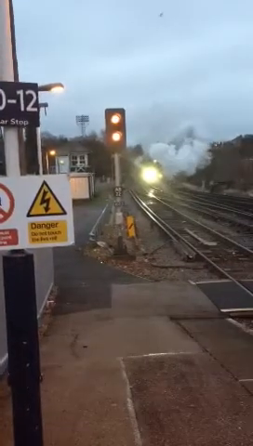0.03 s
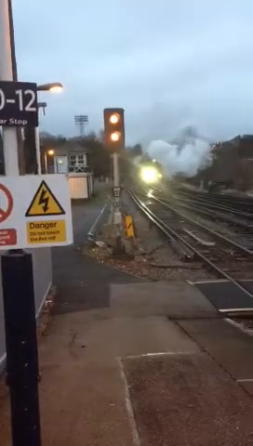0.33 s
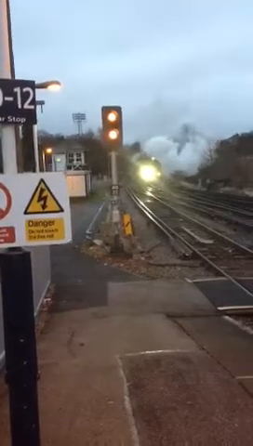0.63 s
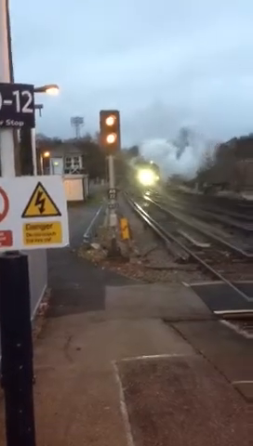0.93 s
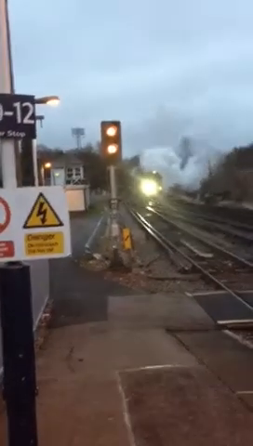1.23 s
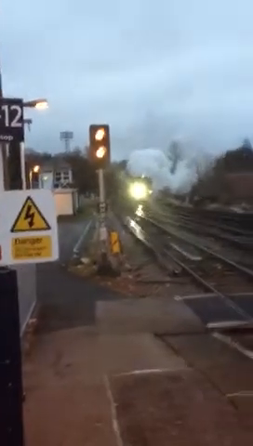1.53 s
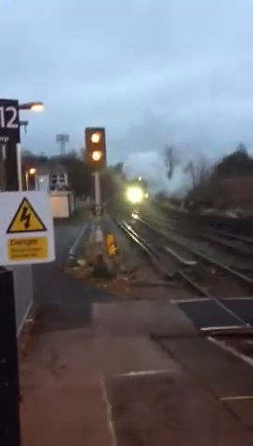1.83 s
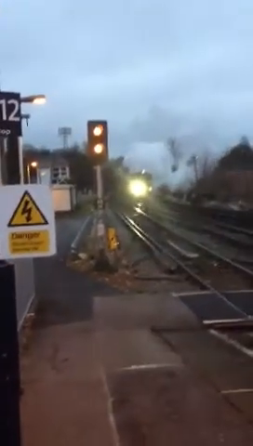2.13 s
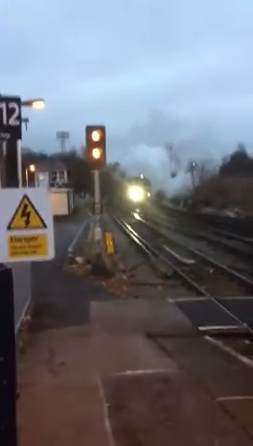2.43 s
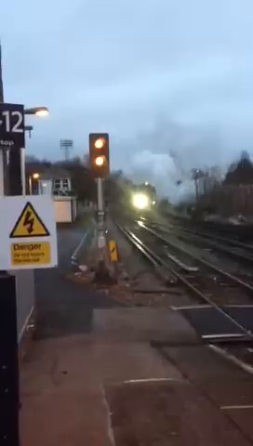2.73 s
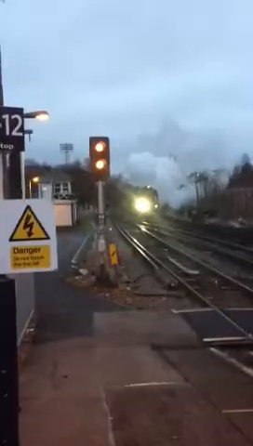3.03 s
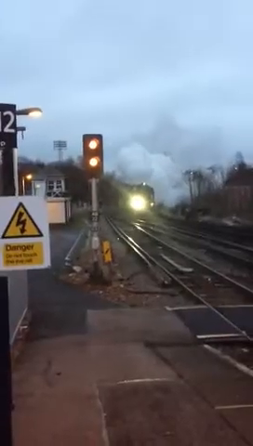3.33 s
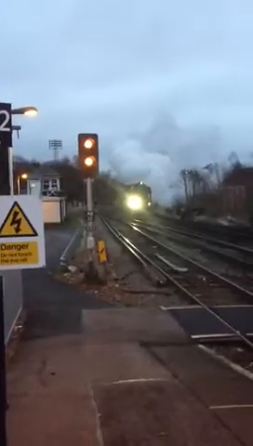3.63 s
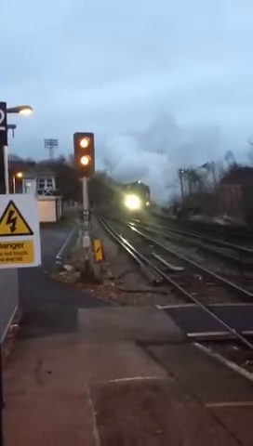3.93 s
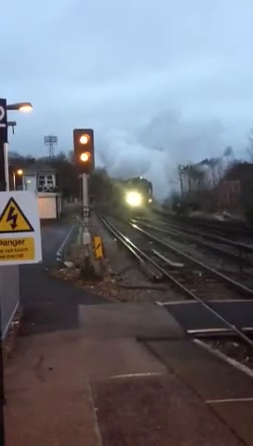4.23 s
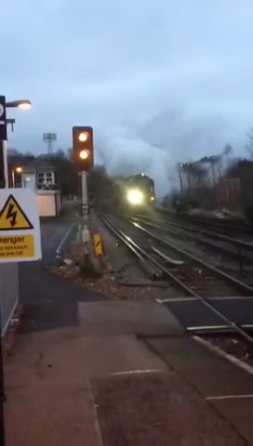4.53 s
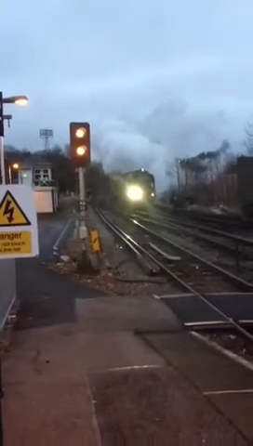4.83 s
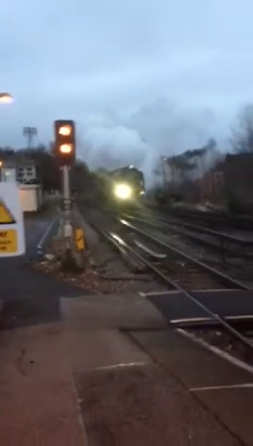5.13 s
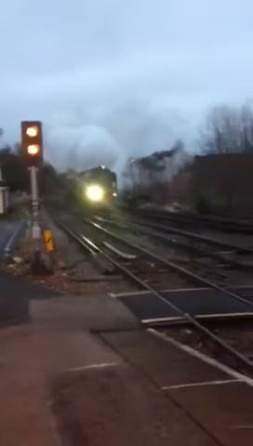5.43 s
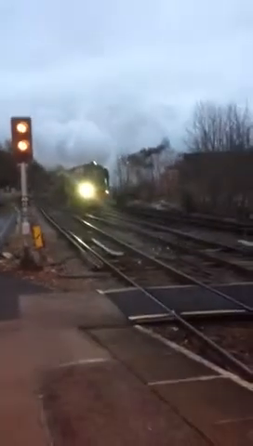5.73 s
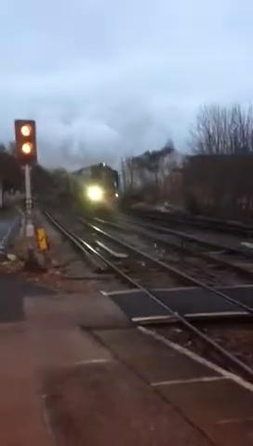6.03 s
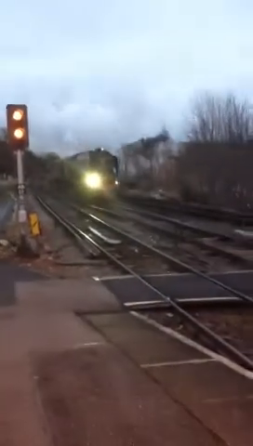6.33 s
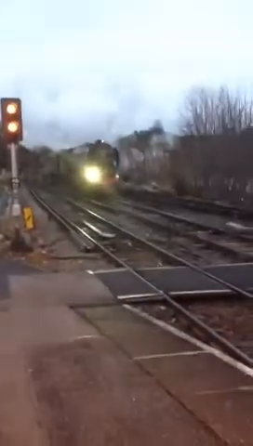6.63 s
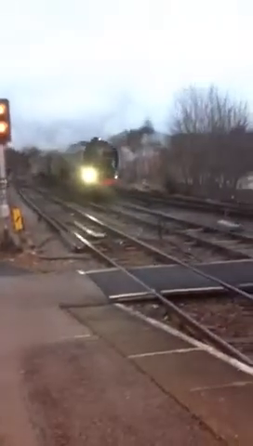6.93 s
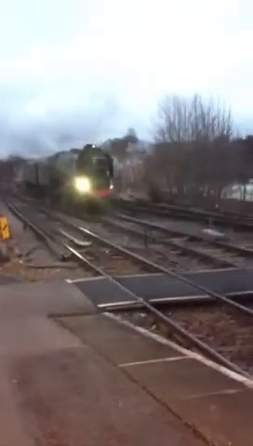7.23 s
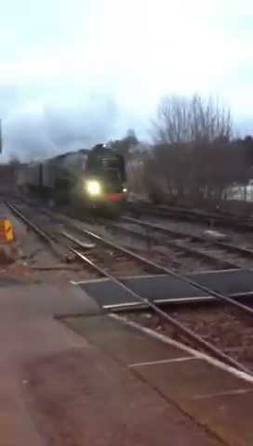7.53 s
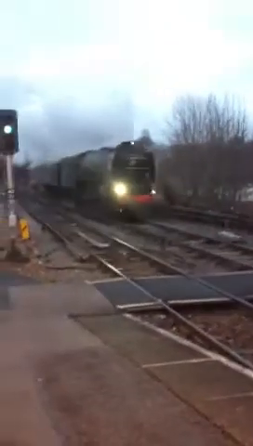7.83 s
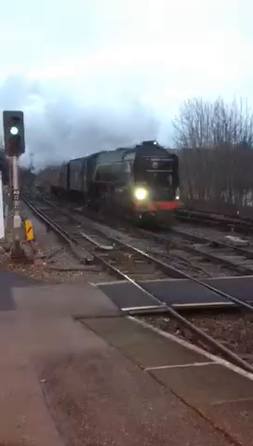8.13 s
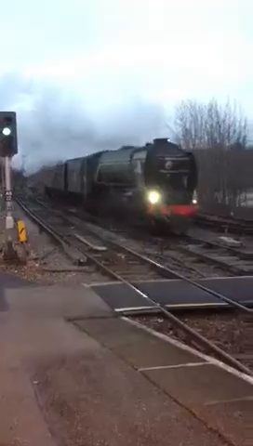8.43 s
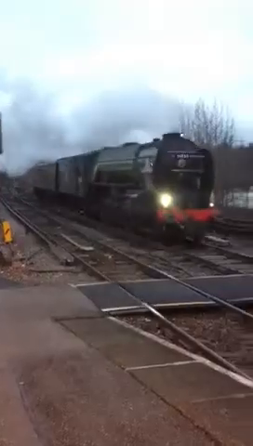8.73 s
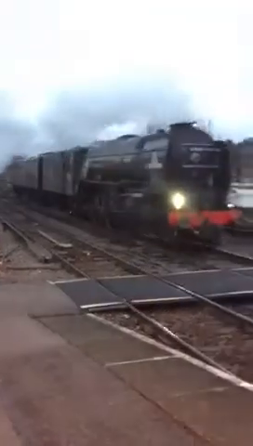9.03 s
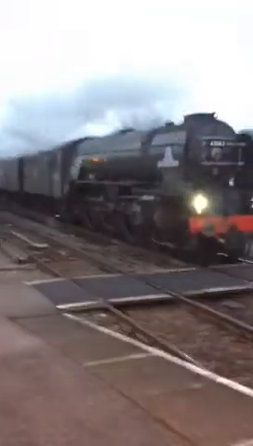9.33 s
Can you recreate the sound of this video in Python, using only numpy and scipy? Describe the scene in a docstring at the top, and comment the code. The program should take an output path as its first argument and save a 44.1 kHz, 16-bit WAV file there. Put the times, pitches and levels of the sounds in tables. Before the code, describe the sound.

Heard from a windy platform, a far-off steam engine chuffs rapidly, with one very faint, brief hoot near the start. Gusts then rumble and knock hard against the microphone, sometimes with a small crackle. The train keeps coming through the wind, its exhaust beats quickening a little and swelling along with rolling wheel noise and steam hiss into a dense, close roar.

```python
"""Steam locomotive nearing a windy platform.

A three-cylinder engine accelerates towards a phone. Each exhaust beat is a noise blast from the
chimney, seven to nine a second, over a growing roar of wheels and leaking steam. Gusts hit the
microphone as rumble and sharp buffets; the train's level dips briefly after the hardest."""
import sys
import numpy as np
from scipy import signal
from scipy.fft import rfft, irfft, next_fast_len
from scipy.io import wavfile

SR = 44100
rng = np.random.default_rng(int(sys.argv[2]) if len(sys.argv) > 2 else 0)


def bounce(signal):
    """Save signal as a 16-bit WAV file at the path given by the first command-line argument."""
    frames = np.transpose(np.atleast_2d(signal))
    limited = np.clip(frames, -1, 1)
    pcm = np.round(limited * 32767).astype(np.int16)
    wavfile.write(sys.argv[1], SR, pcm)


N = 422919
TIME_S = np.arange(N) / SR
FREQS_HZ = np.fft.rfftfreq(N, 1 / SR)
LEVEL_BAND_HZ = (2400, 8000)  # exhaust and wheel noise have unit rms here

# Engine colour far off, halfway and close. Each row: frequency in Hz, gain in dB.
FAR_COLOUR = [(60, -7), (200, 11.5), (500, 3.5), (750, 2.5), (1200, 2), (1750, -4.5), (2400, -5.5),
              (4000, -11), (6000, -15), (8500, -14.5), (11000, -21)]
HALFWAY_COLOUR = [(60, -32), (200, 2), (500, 3), (750, 6.5), (1300, -1.5), (1800, -3.5), (2600, -2),
                  (4000, -9), (6000, -15.5), (8500, -17.5), (11000, -30)]
NEAR_COLOUR = [(60, -26), (200, 4.5), (500, 5), (750, 1), (1200, 1.5), (1700, -4.5), (2600, -8.5),
               (4000, -12.5), (6000, -19.5), (8500, -19), (11000, -24)]
STAGES = (FAR_COLOUR, HALFWAY_COLOUR, NEAR_COLOUR)
# Approach. Each row: time in seconds, stage (0 far, 1 halfway, 2 close).
APPROACH = [(3.0, 0.027), (4.2, 1.1), (5.5, 0.92), (6.6, 2)]
# Acceleration. Each row: time in seconds, exhaust beats per second.
BEAT_RATE = [(0, 6.842), (1.2, 6.864), (9.6, 9.088)]
# One turn of the driving wheels. Each entry: a beat's level offset in dB.
WHEEL_TURN_DB = [-1.4, 0.34, 0.41, -0.84, -.2, 0.28]
# Accents. Each row: time in seconds, offset of the nearest beat in dB.
ACCENTS = [(5.99, 0), (6.12, 0), (7.43, -0.5), (8.02, 2.5), (8.48, 1.5), (8.71, 2.5), (9.16, 1.5)]
# Train loudness. Each row: time in seconds, then relative levels of beats, roar and steam in dB.
TRAIN_LEVELS = [(0, -53, -52, -60), (.45, -52, -51.5, -57), (.9, -51, -50, -63.5), (1.6, -48, -47.5, -61),
                (2.25, -44.5, -46.5, -59.5), (2.6, -45, -44, -58), (3.1, -40.5, -46.5, -54.5),
                (3.6, -43.5, -46, -60), (4.3, -42.5, -39, -52), (4.7, -43.5, -38.5, -54.5),
                (5.15, -37.5, -35.5, -48.5), (6, -36, -34.5, -49.5), (6.45, -39, -34.5, -48.5),
                (6.95, -37.5, -32, -48.5), (7.35, -32.8, -32, -42.5), (8.2, -33, -30, -41.5),
                (8.7, -31, -27, -39.5), (9, -29, -25, -36.5), (9.5, -25.5, -25.5, -32)]
# Brief dips in the train's level. Each row: start in seconds, nominal depth in dB.
DIPS = [(1.5, 3.5), (2.458, 10), (3.19, 4.5), (4.62, -1), (5.71, 5.5), (6.22, 2), (6.74, 2), (8.06, 2.5)]
# Chimney bark. Each row: time in seconds, midrange gain in dB.
BARK = [(.4, -1), (1.1, 5), (2.2, 5), (3.4, 3.5), (4.3, 3.5), (5.5, 3.5), (6, -2.5), (8.4, 2.5), (8.7, -4),
        (9.5, -3.5)]
# Band lifted by the ground echo. Each row: time in seconds, centre in Hz, lift in dB.
GROUND_ECHO = [(0, 4430, 3), (.9, 3570, 1.5), (2.2, 3300, 4.5), (3.0, 3100, 1), (3.4, 2610, 5.5),
               (3.8, 2420, 2), (4.1, 1830, 9.5), (4.6, 1750, 13), (5.2, 1700, 6), (6.1, 1680, 8),
               (6.8, 750, 7), (9.5, 563, 3)]
# Gusts. Each row: start in seconds, hold in seconds, relative level in dB.
GUSTS = [(0.743, 0.077, -28), (.85, 0.072, -34), (1.028, 0.038, -26.5), (1.336, 0.039, -30.5),
         (1.467, 0.039, -13.5), (1.608, 0.058, -25.5), (1.828, .11, -28), (1.982, 0.054, -22),
         (2.203, .3, -29.5), (2.53, 0.37, -34), (2.77, 0.25, -28), (3.169, 0.021, -14),
         (3.223, 0.093, -23.5), (3.412, .085, -25.5), (3.526, .03, -23), (3.606, 0.099, -25),
         (3.809, 0.049, -22.5), (3.924, .19, -24), (4.163, 0.016, -30.5), (4.334, .09, -29.5),
         (4.567, .11, -25), (4.9, 0.11, -26.5), (5.29, 0.09, -27), (5.538, 0.04, -31), (5.633, 0.086, -17),
         (5.835, 0.016, -23.5), (6.168, 0.14, -19.5), (6.336, 0.22, -21.5), (6.638, .11, -14.5),
         (6.78, 0.24, -23), (6.926, 0.042, -14.5), (6.986, 0.37, -24), (7.446, 0.36, -30),
         (7.86, 0.21, -19.5), (8.333, .1, -21.5), (8.532, 0.39, -26), (9.107, 0.078, -17.5),
         (9.294, 0.57, -33)]
# Breeze between gusts. Each row: time in seconds, relative level in dB.
BREEZE = [(0, -52), (3.1, -39.5), (4.3, -39), (5.2, -35), (6.1, -28.5), (9.5, -31)]
# Eddy strikes. Each row: time in seconds, thump peak in dB, pitch in Hz, crack offset in dB.
BUFFETS = [(0.973, -11, 193, -35), (1.066, -11.5, 204, -35), (1.23, -14.5, 180, -29), (1.5, 1, 320, -24),
           (1.627, -10, 206, -25), (1.777, -13.5, 247, -28), (1.932, -13, 221, -19), (2.005, -13, 178, -43),
           (2.039, -7.5, 236, -38), (2.234, -8.5, 237, -31), (2.295, -11, 184, -41),
           (2.345, -10.5, 250, -30), (2.455, -3, 178, -14), (2.463, -5, 242, 1.5), (2.483, -14, 374, -4.5),
           (2.775, -12, 188, -26), (2.826, -10.5, 222, -15.5), (2.975, -9.5, 318, -19),
           (3.175, -0.5, 480, -11), (3.471, -15.5, 252, -5.5), (3.542, -5, 270, -23),
           (3.605, -11, 340, -23), (3.662, -6, 273, -7), (4.411, -10, 212, -23), (4.473, -10.5, 256, -21),
           (4.616, -6, 330, -16), (4.945, -7.5, 250, -16), (5.02, -12, 270, -32), (5.339, -1.5, 310, -18.5),
           (5.347, -5.5, 400, -16), (5.698, -2, 335, -11), (5.84, -5, 345, -23), (5.855, -12.5, 302, -20),
           (6.123, -7, 247, -19), (6.183, -6.5, 215, -6), (6.214, 0, 368, -12.5), (6.374, -7.5, 225, -14),
           (6.467, -7, 400, -26), (6.499, -8, 553, -10), (6.734, 3.5, 288, -16), (6.772, -7.5, 296, -12),
           (6.859, -4, 215, -21), (6.943, -7, 253, -31), (7.141, -9, 204, -15), (7.29, -1, 270, -13.5),
           (7.63, -2, 305, -11.5), (7.886, -1, 167, -27), (7.922, 1, 384, -15), (8.047, -1, 186, -16)]
# Hoot. Each row: time in seconds, pitch in Hz, level in dB.
HOOT = [(.57, 513, -73), (.6, 504, -50), (.635, 552, -52), (.67, 504, -52), (.71, 403, -52),
        (.74, 373, -68)]
# Peaks and notches of the phone's sound inlet. Each row: centre in Hz, width in Hz, gain in dB.
INLET_BANDS = [(930, 170, -6), (1170, 160, 1), (1410, 140, -4), (1590, 140, 2.5), (1900, 130, -2.5),
               (2050, 130, 1.5), (2250, 220, -3), (2590, 220, 2), (2920, 170, -3), (3260, 280, 2.5),
               (3640, 240, -2.5), (4080, 300, 1), (4750, 280, 3.5), (5040, 260, -3), (6850, 250, 3),
               (7580, 300, 2.5), (10000, 1200, -2.5)]
# Source colours. Each row: frequency in Hz, relative gain in dB.
JET_COLOUR = [(100, -7), (600, -3), (1500, -1.5), (3500, 2), (7000, 4), (10000, -0.5), (14000, -3)]
WHEEL_COLOUR = [(100, 18), (300, -2.5), (700, 7), (1500, 7), (4000, 9), (9000, 8.5), (14000, -17)]
STEAM_COLOUR = [(2000, 0), (5000, 6), (8400, 5.5), (9800, 4.5), (12500, 4), (15000, -2)]
RUMBLE_COLOUR = [(25, -37), (45, -40), (70, -64), (100, -8.5), (150, 1.5), (230, 3), (310, -4), (400, -11),
                 (600, -31), (1000, -61), (2500, -75)]
FLAP_COLOUR = [(150, -19), (380, 12.5), (560, 7), (850, -1.5), (1300, -18.5), (2500, -45), (8000, -62)]
CRACK_COLOUR = [(100, -29), (350, 18.5), (550, 16.5), (850, 9.5), (1400, -5), (2500, -8.5),
                (4400, -22.5), (5800, -52)]


def exhaust(inlet, rise_s=0.017, fall_s=0.03, tail_s=0.058, tail_share=0.52, trim_db=2,
            echo_gain=0.22, tear_db=1.2, lift_octaves=0.19, air_db=5, size=2 ** 14):
    """Each valve opening lets out a blast that swells fast and dies away along the lineside."""
    out, shares = np.zeros(N + 2 * size), stage_shares()
    lift_hz, lift_db = curves(GROUND_ECHO)
    hz = np.fft.rfftfreq(size, 1 / SR)
    in_band = (hz > LEVEL_BAND_HZ[0]) & (hz < LEVEL_BAND_HZ[1])
    jet = inlet * colour(JET_COLOUR)
    colours = np.array([np.interp(hz, FREQS_HZ, jet * colour(stage)) for stage in STAGES])
    chimney = np.interp(hz, FREQS_HZ, bell(hz=1220, width_hz=1000))
    lead = size // 4  # samples before the peak
    age_s = (np.arange(size) - lead) / SR
    direct = np.exp(-0.5 * (age_s / np.where(age_s < 0, rise_s, fall_s)) ** 2)
    tail = np.exp(-abs(age_s) / tail_s)
    envelope = np.where(age_s < 0, direct, (1 - tail_share) * direct + tail_share * tail)
    for peak_s, level_db, bark_db in beats():
        at = min(int(peak_s * SR), N - 1)
        lift = np.exp(-0.5 * (np.log2((hz + 1) / lift_hz[at]) / lift_octaves) ** 2)
        delays_s = rng.uniform(0.00109, 0.009, size=(4, 1))  # off ballast, rails and buildings
        comb = 1 + echo_gain * np.exp(-2j * np.pi * hz * delays_s).sum(axis=0)
        gain = shares[:, at] @ colours * abs(comb) * undb(lift_db[at] * lift)
        gain *= undb(-air_db * shares[0, at] * (hz / LEVEL_BAND_HZ[1]) ** 2)  # air absorbs far treble
        gain /= np.sqrt(np.mean(gain ** 2 * in_band))
        blast = irfft(rfft(rng.standard_normal(size)) * gain * undb(bark_db * chimney))
        start = at + size - lead
        out[start:start + size] += undb(level_db + trim_db) * envelope * blast
    return out[size:size + N] * undb(tear_db * flicker(rate_hz=120))


def beats(limp_s=0.0035, scatter_db=1.03, bark_scatter_db=0.8):
    """Time, level and bark of each beat; uneven valves make them alternately early and late."""
    count = beat_count()
    beat_db, _, _ = train_levels_db()
    bark_db, = curves(BARK)
    index = np.arange(int(count[-1]) + 1)
    times_s = np.interp(index, count, TIME_S) - limp_s * (-1) ** index
    strength, tone = rng.standard_normal((len(index), 2)).T
    levels_db = np.interp(times_s, TIME_S, beat_db) + scatter_db * strength
    levels_db += np.resize(WHEEL_TURN_DB, len(index))
    for accent_s, offset_db in ACCENTS:
        levels_db[np.argmin(abs(times_s - accent_s))] += offset_db
    return zip(times_s, levels_db, np.interp(times_s, TIME_S, bark_db) + bark_scatter_db * tone)


def beat_count(first_s=0.035):
    """Exhaust beats since the first, per sample."""
    rate_hz, = curves(BEAT_RATE)
    return np.cumsum(rate_hz) / SR - first_s * rate_hz[0]


def train_levels_db(attack_s=0.025, recovery_db_per_s=13):
    """Levels of beats, roar and steam; each dip sets in fast and recovers steadily."""
    dip_db = np.zeros(N)
    for start_s, depth_db in DIPS:
        age_s = TIME_S - start_s
        dip_db += np.clip(age_s / attack_s, 0, 1) * np.maximum(depth_db - recovery_db_per_s * age_s, 0)
    return [level_db - dip_db for level_db in curves(TRAIN_LEVELS)]


def stage_shares():
    """Weights of the far, halfway and close colours, per sample."""
    stage, = curves(APPROACH)
    return np.clip(1 - abs(stage - np.arange(len(STAGES))[:, None]), 0, 1)


def wheel_roar(inlet, trim_db=-7, flicker_db=0.21):
    """Wheels, running gear and echoes merge into a roar."""
    _, roar_db, _ = train_levels_db()
    tint = inlet * colour(WHEEL_COLOUR)
    roar = sum(np.sqrt(share) * noise(colour(stage) * tint, LEVEL_BAND_HZ)
               for share, stage in zip(stage_shares(), STAGES))
    return roar * undb(roar_db + trim_db + flicker_db * flicker(rate_hz=29))


def steam_leak(inlet, trim_db=-4.5, throb_db=1.1, lag_beats=0.1, flicker_db=0.93):
    """Leaking steam hisses and pulses with the pistons."""
    _, _, steam_db = train_levels_db()
    hiss = noise(inlet * colour(STEAM_COLOUR), band_hz=(9500, 15000))
    pulse_db = throb_db * np.cos(2 * np.pi * (beat_count() - lag_beats))
    return hiss * undb(steam_db + trim_db + pulse_db + flicker_db * flicker(rate_hz=22))


def wind(calm_db=-55, strong_db=-25, flutter_db=4, rumble_trim_db=-1,
         flap_trim_db=-15, flap_growth=1.655, flap_flutter_db=1.5):
    """Turbulence rumbles on the inlet; stronger gusts also flap in the midrange."""
    wind_db = gust_level_db()
    # Calm air is steady; gusts tear into bursts and lulls.
    unrest = np.clip((wind_db - calm_db) / (strong_db - calm_db), 0, 1)
    wind_db += flutter_db * unrest * np.minimum(flicker(rate_hz=46), 1)
    flap_db = strong_db + flap_trim_db + flap_growth * (wind_db - strong_db)
    flap = noise(colour(FLAP_COLOUR)) * undb(flap_db + flap_flutter_db * flicker(rate_hz=58))
    rumble = noise(colour(RUMBLE_COLOUR)) * undb(wind_db + rumble_trim_db)
    return rumble + flap


def gust_level_db(attack_s=0.03, release_s=0.032):
    """Each gust rises, holds and dies away over the breeze."""
    breeze_db, = curves(BREEZE)
    power = undb(breeze_db) ** 2
    for start_s, hold_s, level_db in GUSTS:
        end_s = start_s + hold_s
        ramp = np.interp(TIME_S, [start_s - attack_s, start_s, end_s, end_s + release_s], [0, 1, 1, 0])
        power += (undb(level_db) * ramp ** 2) ** 2
    return 10 * np.log10(power)


def buffets(rise_cycles=0.33, ring_cycles=0.36, click_db=20, crackle_db=3, crackle_s=0.0017):
    """An eddy shoves the diaphragm for a cycle or two; hard ones break up with a click and crackle."""
    thumps, cracks = np.zeros(N), np.zeros(N)
    phases = rng.uniform(0, 2 * np.pi, len(BUFFETS))
    for (peak_s, peak_db, hz, offset_db), phase in zip(BUFFETS, phases):
        span = slice(int((peak_s - 0.05) * SR), int((peak_s + 0.05) * SR))
        age_s = TIME_S[span] - peak_s
        cycles = age_s * hz
        width_cycles = np.where(cycles < 0, rise_cycles, ring_cycles)
        envelope = np.exp(0.5 - np.hypot(cycles / width_cycles, 0.5))
        thumps[span] += undb(peak_db) * envelope * np.sin(2 * np.pi * cycles + phase)
        crackle = np.exp(-abs(age_s) / crackle_s) * rng.standard_normal(len(age_s))
        cracks[span] += undb(peak_db + offset_db + crackle_db) * crackle
        cracks[int(peak_s * SR)] += undb(peak_db + offset_db + click_db)
    return thumps + irfft(rfft(cracks) * colour(CRACK_COLOUR), N)


def hoot():
    """A faint tone rises a little and falls away just before the first gust."""
    hz, level_db = curves(HOOT)
    sounding = (TIME_S > HOOT[0][0]) & (TIME_S < HOOT[-1][0])
    return np.sqrt(2) * undb(level_db) * sounding * np.sin(2 * np.pi * np.cumsum(hz) / SR)


def undb(db):
    """Decibels to gain."""
    return 10 ** (np.asarray(db) / 20)


def curves(table):
    """Columns of a timed table, interpolated per sample."""
    times_s, *columns = np.transpose(table)
    return [np.interp(TIME_S, times_s, column) for column in columns]


def colour(points):
    """Gain per frequency from (Hz, dB) points."""
    hz, db = np.transpose(points)
    return undb(np.interp(np.log(FREQS_HZ + 1), np.log(hz), db))


def bell(hz, width_hz):
    """Gaussian over frequency, 1 at its centre."""
    return np.exp(-np.log(2) * (2 * (FREQS_HZ - hz) / width_hz) ** 2)


def noise(gain, band_hz=(0, SR)):
    """Coloured noise, unit rms inside the band."""
    size = next_fast_len(N)
    hz = np.fft.rfftfreq(size, 1 / SR)
    gain = np.interp(hz, FREQS_HZ, gain)
    power = np.mean(gain ** 2 * ((hz >= band_hz[0]) & (hz <= band_hz[1])))
    return irfft(rfft(rng.standard_normal(size)) * gain, size)[:N] / np.sqrt(power)


def flicker(rate_hz):
    """Smooth random signal, unit rms."""
    return noise(bell(0, 2 * rate_hz))


def scene():
    """The train through the phone's inlet, wind on the microphone and a faint hoot; mono."""
    inlet = undb(sum(db * bell(hz, width_hz) for hz, width_hz, db in INLET_BANDS))
    train = exhaust(inlet) + wheel_roar(inlet) + steam_leak(inlet)
    return (train + wind() + buffets() + hoot())[None]


def record(dry, bass_hz=65, top_hz=15350):
    """The phone rounds the hardest peaks, thins the deep bass and cuts the top."""
    rounded = 0.83 * np.tanh(dry / 1.002)
    thinned = signal.sosfilt(signal.butter(3, bass_hz, "high", fs=SR, output="sos"), rounded)
    return signal.sosfilt(signal.ellip(12, 0.2, 80, top_hz, fs=SR, output="sos"), thinned)


dry = scene()
out = record(dry)
bounce(out)
```